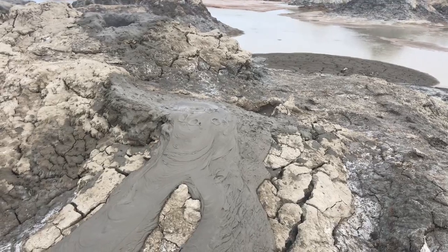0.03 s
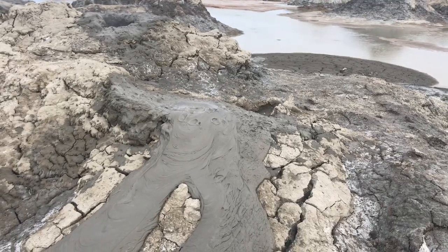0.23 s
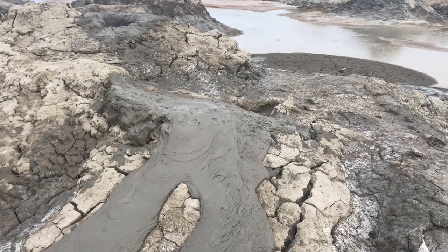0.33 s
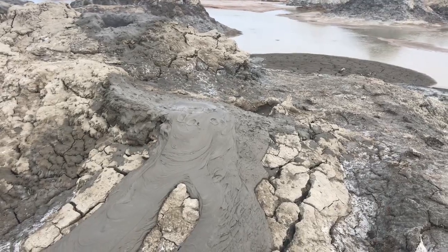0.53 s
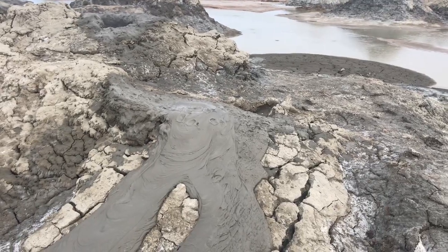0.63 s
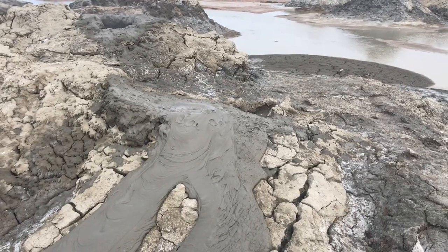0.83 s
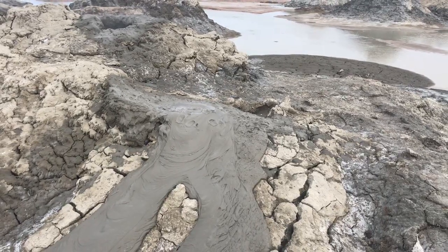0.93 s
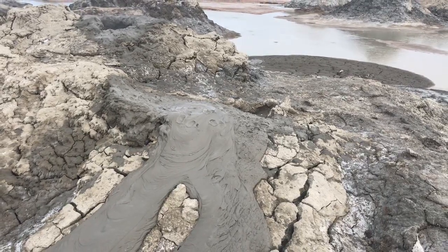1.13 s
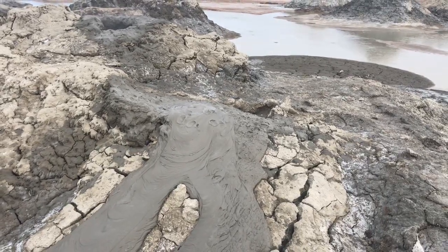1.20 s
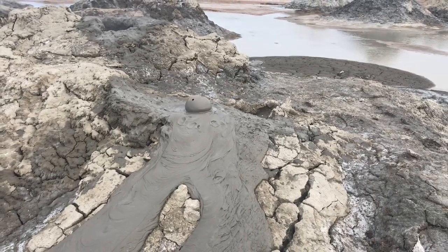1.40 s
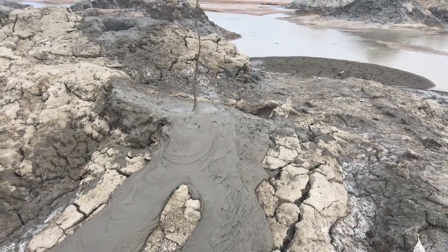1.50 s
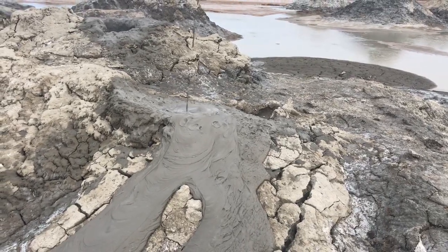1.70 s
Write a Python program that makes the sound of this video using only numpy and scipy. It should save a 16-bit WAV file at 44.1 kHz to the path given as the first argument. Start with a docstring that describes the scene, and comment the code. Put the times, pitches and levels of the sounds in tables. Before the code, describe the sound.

Close mud pool outdoors: a low, full bloop with wet tearing, fine spatter and a quieter stretch, then a short rising blurp and bright drop ticks; soft wind rumble and very faint hiss throughout.

```python
"""A low gusting wind rumble, a faint hiss and the fine crackle of seeping gas lie over an outdoor mud pool.
Close to the microphone gas bubbles burst: each pocket rings as a gliding sine until the mud shuts it.
The skin tears in a wet fizz of tiny damped rings, and flung drops tick, each a noise click and a short ring.
Late on, one bubble spits in a rising sweep. The banks return a short scatter of noise-like echoes."""
import sys
import numpy as np
from scipy import signal
from scipy.fft import rfft, irfft
from scipy.io import wavfile
from scipy.ndimage import uniform_filter1d

SR = 44100
rng = np.random.default_rng(int(sys.argv[2]) if len(sys.argv) > 2 else 0)


def transcribe(u):
    """Save the signal u as a 16-bit wav file named by the first command-line argument.

    u: samples, shape (n,) or (channels, n), limited to [-1, 1]; the rate is SR.
    q: integer samples, one column per channel.
    """
    v = np.clip(np.atleast_2d(u).T, -1, 1)
    q = np.round(v * 32767).astype(np.int16)
    wavfile.write(sys.argv[1], SR, q)


N = 77175
AGE = np.arange(SR // 4) / SR  # time since an event began [s]; every event is cut off at 0.25 s
TOP_HZ = 15750  # upper limit of the recorder and of the snap pitches


def undb(db):
    """Decibels to gain."""
    return 10 ** (np.asarray(db) / 20)


def unit(x):
    """Scale to an rms of one."""
    return x / np.sqrt(np.mean(x ** 2))


def walk(rate_hz, size):
    """Wander in straight ramps between random values, with a spread near one."""
    k = max(int(SR / rate_hz), 2)
    values = rng.standard_normal(1024)
    steps = values[np.arange(size) // k % 1024]
    return uniform_filter1d(steps, k)


def coloured(points):
    """Noise shaped in frequency to the given spectrum, at an rms of one."""
    hz, db = np.array(points).T
    f = np.arange(N // 2 + 1) * SR / N + 1  # the 1 Hz offset avoids log(0)
    gain = undb(np.interp(np.log(f), np.log(hz), db))
    return unit(irfft(rfft(rng.standard_normal(N)) * gain, N))


def air():
    """Gusting wind rumble under a steady faint hiss, both shaped noise."""
    # wind rumble and hiss spectra: (frequency [Hz], relative level per Hz [dB])
    wind = [(20, -29.5), (30, -24), (42, 0.5), (60, 5.5), (80, 3.5), (105, -6), (125, -1), (160, -10),
            (230, -15.5), (330, -24), (500, -37), (900, -61)]
    hiss = [(290, -12), (500, 3.5), (594, 1.5), (716, -3.5), (982, -3), (1270, -4), (1390, -3.5),
            (1510, -3), (1800, -10), (2260, -8.5), (3530, -13.5), (4570, -17), (4910, -21), (6270, -12.5),
            (8720, -24.5), (9510, -22), (10500, -31.5), (14000, -24.5), (15500, -38.5)]
    # slow rise and fall of the wind: (time [s], level change [dB])
    breeze = [(0, -2.5), (.52, -2), (.64, 2), (.74, -1), (.86, 1), (1.12, -.5), (1.27, 2), (1.45, -.5),
              (1.75, -2)]
    wind_db, hiss_db = -41.5, -65  # wind level is before the breeze and gusts
    gust_db, gust_hz = 1.2, 18
    strength_db = np.interp(np.arange(N) / SR, *np.array(breeze).T)
    strength_db = strength_db + gust_db * walk(gust_hz, N)
    rumble = undb(wind_db + strength_db) * coloured(wind)
    return rumble + undb(hiss_db) * coloured(hiss)


def add(out, start, sound):
    """Mix a sound in at its time [s]."""
    i = max(int(start * SR), 0)
    out[i:i + len(sound)] += sound[:max(N - i, 0)]


def crackle(rate, hz, scatter_db, size):
    """A crowd of microbubbles at random times, each a few damped cycles at its own pitch."""
    pitch_octaves, decay_cycles = 0.41, 14.7  # pitch spread; cycles to fall by 60 dB
    out = np.zeros(N)
    age = AGE[:SR // 100]
    chance = rng.random(size)
    spread = rng.standard_normal((size, 2))  # pitch, level
    for i in np.flatnonzero(chance < rate / SR):
        cycles = min(hz * 2 ** (pitch_octaves * spread[i, 0]), TOP_HZ) * age
        onset = 1 - np.exp(-2 * cycles)
        decay = np.exp(-np.log(1000) * cycles / decay_cycles)
        ring = np.sin(2 * np.pi * cycles) * decay * onset
        add(out, i / SR, undb(scatter_db * min(spread[i, 1], 2)) * ring)
    return unit(out[:size])


def seep():
    """Seeping gas crackles faintly throughout as sparse microbubbles."""
    per_s, centre_hz, level_db, scatter_db = 150, 1460, -73, 2
    return undb(level_db) * crackle(per_s, centre_hz, scatter_db, N)


def envelope(swell, hold, t60):
    """Rounded swell, hold and exponential fade, all in seconds."""
    rise = np.sin(np.pi / 2 * np.minimum(AGE / swell, 1))
    return rise * np.exp(-np.log(1000) * np.maximum(AGE - swell - hold, 0) / t60)


def cavity(hz, rough):
    """A gas pocket rings along a pitch path; its soft, uneven walls make pitch and level waver."""
    flutter_hz, flutter_db, wobble = 255, 1.84, 0.013  # wobble is a share of the pitch; rough scales both
    pitch = hz * (1 + rough * wobble * walk(flutter_hz, len(hz)))
    pitch = np.minimum(pitch, SR / 2)
    level = undb(rough * flutter_db * walk(flutter_hz, len(hz)))
    return np.sin(2 * np.pi * np.cumsum(pitch) / SR) * level


def bloops():
    """Bubbles open, ring with a gliding pitch and are shut again by the mud."""
    # ringing gas pockets: (time [s], starting pitch [Hz], glide [octaves/s], level before flutter [dB],
    # swell [s], hold [s], 60 dB decay [s], shut after [s], roughness [1])
    pockets = [(.198, 180.3, -.5, -15.5, 0.018, 0.0086, 0.11, 0.13, .15),
               (.199, 318, 53, -33, 0.00076, 0.0037, 0.048, 0.023, .9),
               (.205, 496, 6.5, -43, .004, 0.0071, 0.1, 0.027, 1.53),
               (0.199, 1117, 1.5, -52.5, 0.0025, 0.0044, .13, 0.051, 2.2),
               (0.226, 217, 21, -29, 0.0043, .017, 0.069, 0.031, 0.32),
               (.2525, 586, 13.5, -39, 0.0013, .005, 0.078, 0.021, 2),
               (0.268, 741, 14, -42, 0.0031, .006, 0.058, 0.034, 2),
               (0.2522, 938, 1, -52, 0.0014, 0.035, 0.11, .056, 2),
               (0.301, 405, -10, -46, .003, 0.0031, 0.099, 0.037, 1.7),
               (0.65, 1184, 79, -56, 0.0024, 0.005, .03, .013, 3),
               (1.129, 1320, 24, -58, 0.007, 0.015, 0.03, 0.026, 2.4),
               (1.432, 589, 35, -52, 0.019, 0.0087, 0.03, 0.038, 0.66),
               (1.465, 1406, 22, -52.5, 0.006, 0.012, 0.072, 0.025, 1.8),
               (1.468, 4440, 0, -69, 0.015, 0.0099, 0.06, 0.034, 2.3)]
    close_s = 0.0045
    out = np.zeros(N)
    for start, hz, glide, db, swell, hold, t60, length, rough in pockets:
        still_open = np.sin(np.pi / 2 * np.clip((length - AGE) / close_s, 0, 1)) ** 2
        ring = cavity(hz * 2 ** (glide * AGE), rough) * envelope(swell, hold, t60)
        add(out, start, undb(db) * ring * still_open)
    return out


def tears():
    """The wet skin rips in a short crowd of tiny snaps and throws off a fine spray."""
    # tearing, spattering skin: (time [s], swell [s], 60 dB decay [s], snap level before envelope [dB],
    # snap centre [Hz], spray level before envelope [dB])
    rips = [(0.2001, 0.0011, 0.083, -53.5, 3600, -66), (.252, .001, 0.064, -50.5, 1215, -71),
            (0.27, 0.0015, 0.056, -56, 2800, -70), (.281, .002, 0.086, -61, 1250, -70.5),
            (0.314, 0.016, .06, -61.5, 1930, -83), (0.368, 0.021, 0.13, -63.5, 2690, -72.5),
            (.407, 0.0024, 0.055, -49.5, 3270, -58), (0.416, 0.0063, 0.058, -56.5, 1050, -72),
            (0.614, 0.017, 0.098, -58.5, 1970, -84), (0.652, 0.0033, 0.044, -53, 1360, -69),
            (.933, 0.0034, 0.17, -60.5, 980, -90), (1.136, .008, 0.042, -58, 1490, -84),
            (1.304, 0.017, 0.45, -64, 1387, -85), (1.451, .008, 0.13, -54.5, 2600, -67),
            (1.487, 0.0034, 0.21, -63, 3440, -68.5), (1.676, 0.0036, .04, -67, 5050, -68.5)]
    snaps_per_s, spray_per_s, spray_hz, scatter_db = 5000, 3500, 8420, 3.5
    out = np.zeros(N)
    for start, swell, t60, db, hz, spray_db in rips:
        snaps = undb(db) * crackle(snaps_per_s, hz, scatter_db, len(AGE))
        spray = undb(spray_db) * crackle(spray_per_s, spray_hz, scatter_db, len(AGE))
        add(out, start, (snaps + spray) * envelope(swell, 0, t60))
    return out


def band(x, hz, width):
    """Broad resonance; the width is a share of the centre."""
    b, a = signal.iirpeak(hz, 1 / width, fs=SR)
    return signal.lfilter(b, a, x)


def drops():
    """Landing drops and popping bubbles each click and ring a tiny pocket of air."""
    # drops and tiny bubbles: (time [s], starting pitch [Hz], glide [octaves/s], ring level before flutter [dB],
    # ring 60 dB decay [s], click level before envelope [dB], click centre [Hz])
    ticks = [(0.37, 1480, 6, -47, 0.025, -49.5, 3620), (.3826, 2050, 1, -44.5, 0.0077, -54, 3500),
             (0.4067, 2950, -17, -40, 0.0085, -49, 3400), (0.407, 8320, -1, -56, 0.059, -65, 8940),
             (0.4132, 2480, 0, -46.5, 0.039, -63, 2980), (0.4123, 4240, 0, -53, 0.022, -71, 6000),
              (.703, 900, 7, -54.5, 0.013, -59, 1500), (1.087, 6800, 1, -55.5, 0.0064, -50.5, 4000),
             (1.126, 13200, 2, -61, .010, -74, 12000), (1.514, 9200, 10, -67, .006, -63, 8000),
             (1.5403, 3100, 21, -46.5, 0.012, -48.5, 5760), (1.5402, 11200, -2, -47, 0.0039, -62, 10100),
             (1.5470, 6770, 25, -48, .010, -63, 7000), (1.5530, 3000, 12, -53, 0.017, -57, 6000),
             (1.673, 1200, 16, -52, 0.039, -73, 1500)]
    swell_s, rough = 0.00027, 0.11
    click_t60_s, click_width = 0.0045, 1
    out = np.zeros(N)
    for start, hz, glide, db, t60, click_db, click_hz in ticks:
        noise = rng.standard_normal(len(AGE))
        colour = band(band(noise, click_hz, click_width), click_hz, click_width)
        click = unit(colour) * envelope(1 / SR, 0, click_t60_s)
        ring = cavity(hz * 2 ** (glide * AGE), rough) * envelope(swell_s, 0, t60)
        add(out, start, undb(db) * ring + undb(click_db) * click)
    return out


def spit():
    """One bubble's mouth blows wide open and throws up a jet of mud, sweeping up two octaves."""
    # path of the sweep: (time [s], pitch [Hz], level before flutter [dB])
    sweep = [(1.465, 250, -51), (1.469, 254, -22.5), (1.484, 357, -28), (1.4879, 417, -22.5),
             (1.49, 588, -29.5), (1.4995, 736, -27.5), (1.505, 930, -37), (1.51, 1000, -43),
             (1.514, 1070, -59)]
    rough = 0.99
    out = np.zeros(N)
    when, hz, db = np.array(sweep).T
    t = when[0] + AGE
    ring = cavity(np.interp(t, when, hz), rough) * undb(np.interp(t, when, db))
    add(out, when[0], ring * (t < when[-1]))
    return out


def banks(mud):
    """The crusted banks scatter the mud's sound back as a short burst of decaying random echoes."""
    level_db, swell_s, t60_s = -26, 0.0066, 0.26
    scatter = rng.standard_normal(len(AGE)) * envelope(swell_s, 0, t60_s)
    echoes = signal.fftconvolve(mud, scatter / np.linalg.norm(scatter))[:N]
    return undb(level_db) * echoes


def scene():
    """The mud pool close by, its brief scatter off the banks, and the open air, in mono."""
    background = air()
    mud = seep() + bloops() + tears() + drops() + spit()
    return (mud + banks(mud) + background)[None]


def record(dry):
    """The recorder cuts the top with a steep low-pass filter."""
    low_pass = signal.ellip(10, .2, 80, TOP_HZ, fs=SR, output="sos")  # 0.2 dB ripple, 80 dB stop band
    return signal.sosfilt(low_pass, dry)


dry = scene()
out = record(dry)
transcribe(out)
```